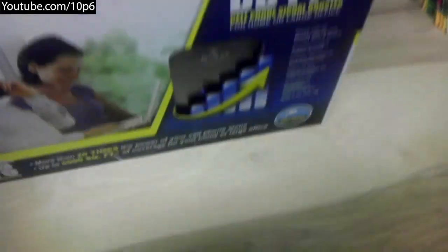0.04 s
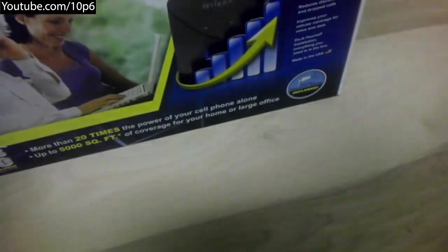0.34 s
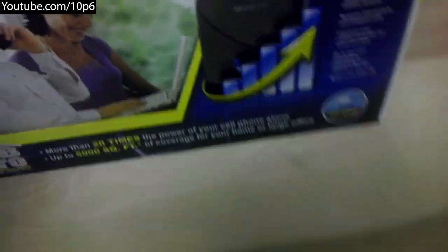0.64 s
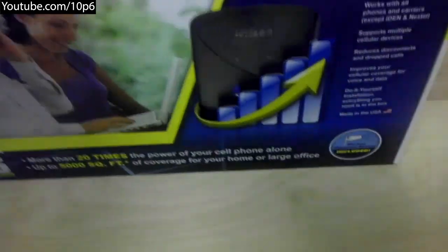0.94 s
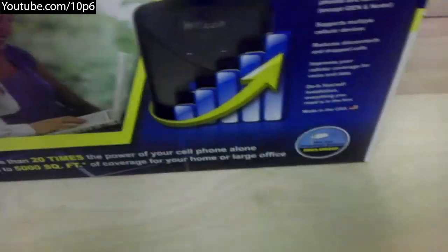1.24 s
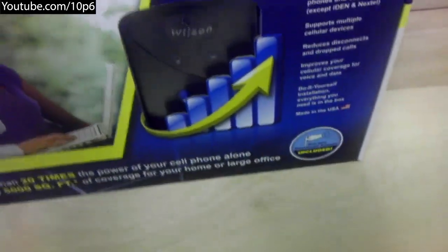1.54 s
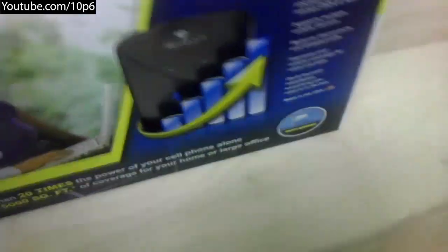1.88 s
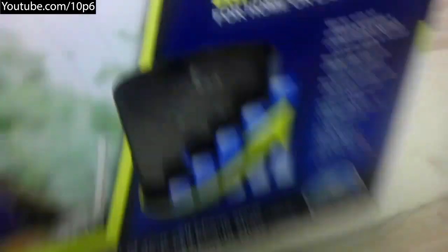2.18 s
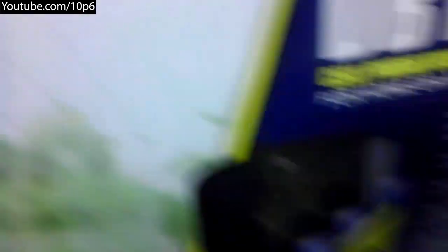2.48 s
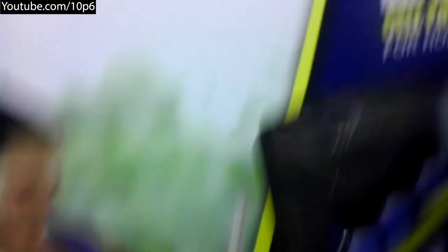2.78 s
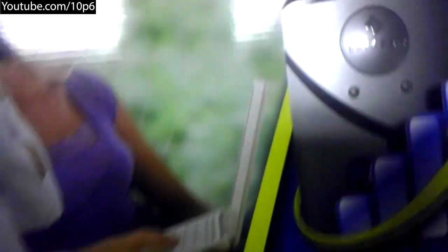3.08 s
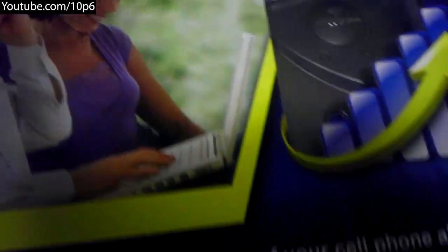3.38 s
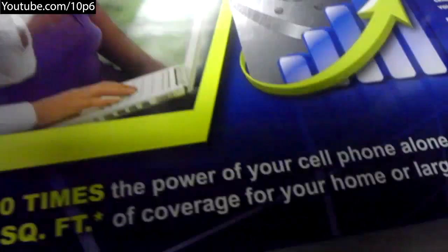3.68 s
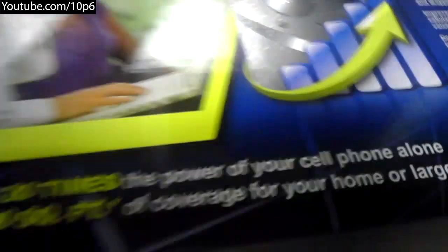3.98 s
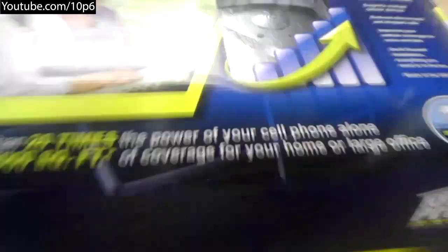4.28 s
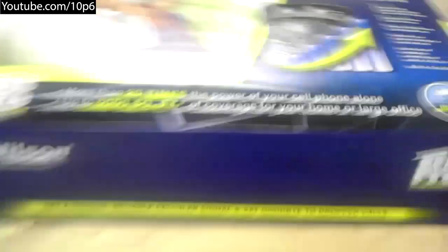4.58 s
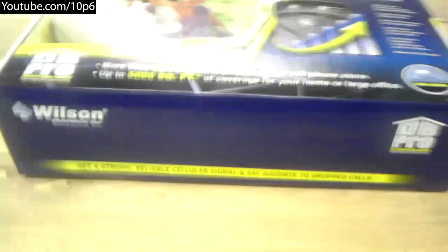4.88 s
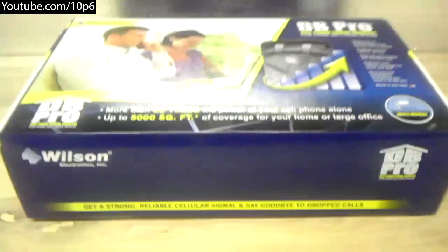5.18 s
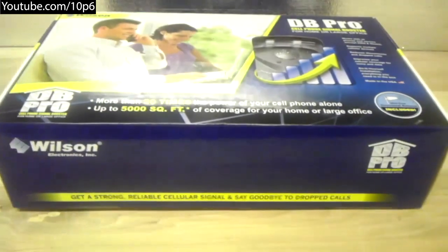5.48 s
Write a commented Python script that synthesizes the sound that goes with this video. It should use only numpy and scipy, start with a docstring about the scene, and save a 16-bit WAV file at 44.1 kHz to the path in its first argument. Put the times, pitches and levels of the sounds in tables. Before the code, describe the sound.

Close cardboard scraping and clusters of knocks as hands tip a big box over and drop it onto a tabletop.

```python
"""A large glossy cardboard box is turned over on a table in a small room, close to the microphone.
First it is gripped: light taps, and card rubbing on hands and table in tiny slips. From 1.7 s it is
tipped and turned: its contents shift and its panels knock, each blow a crack, a clap and a low thump.
At 3.2 s the card sticks and slips in one short squeak, and more knocks follow. From 4.3 s it settles
a little farther off, slapping the tabletop and making it ring; last, the fingers slide off."""
import sys
import numpy as np
from scipy import signal
from scipy.fft import rfft, irfft, next_fast_len
from scipy.io import wavfile
from scipy.ndimage import uniform_filter1d, map_coordinates

SR = 44100
rng = np.random.default_rng(int(sys.argv[2]) if len(sys.argv) > 2 else 0)


def store_pcm(level_fs):
    """Save levels as 16-bit WAV."""
    pcm = np.round(np.clip(level_fs, -1, 1) * 32767).astype(np.int16)
    wavfile.write(sys.argv[1], SR, np.atleast_2d(pcm).T)


N = 243793
RING = np.arange(SR // 2) / SR  # time since a blow [s]
SIDES = np.array([[1], [-1]]) / 2  # splits a left-minus-right amount between the channels


def amp(db):
    """Decibels to gain."""
    return 10 ** (np.asarray(db) / 20)


def unit(x):
    """Scale to rms 1."""
    return x / np.sqrt(np.mean(x ** 2) + 1e-20)


def burst(x):
    """Scale a blow to the energy of 20 ms at rms 1."""
    return x / np.sqrt(np.mean(np.sum(x ** 2, axis=-1)) / (SR * .02))


def along(points, hz):
    """Read (frequency [Hz], value) points along a log frequency axis."""
    freqs, values = np.transpose(points)
    return np.interp(np.log(hz + 1), np.log(freqs), values)


def wobble(rate):
    """A smooth random curve, rate knots a second."""
    knots = rng.standard_normal(int(N * rate / SR) + 4)
    return map_coordinates(knots, [np.arange(N) * rate / SR])


def filtered(x, response):
    """Shape x by a response given as a function of frequency."""
    n = x.shape[-1]
    size = next_fast_len(n + 8192, True)
    return irfft(rfft(x, size) * response(np.fft.rfftfreq(size, 1 / SR)), size)[..., :n]


def add(track, at, sound):
    """Mix in a sound, starting at a time in seconds."""
    part = track[:, max(round(at * SR), 0):][:, :len(RING)]
    part += sound[..., :part.shape[1]]


def spread(pair):
    """Two unrelated signals become left and right: shared bass, diffuse treble."""
    # how alike the two channels are: (frequency [Hz], correlation [0-1])
    likeness = [(35, 0.34), (80, 0.36), (150, 1), (450, 0.9), (1000, .66), (1900, .3), (3500, .22),
                (9000, 0.11)]
    turn = lambda hz: np.arccos(np.clip(along(likeness, hz), -1, 1)) / 2
    mid, side = filtered(pair, lambda hz: np.array([np.cos(turn(hz)), np.sin(turn(hz))]))
    return np.array([mid + side, mid - side])


def room_tone():
    """Quiet room air and microphone hiss."""
    # (frequency [Hz], relative level [dB])
    air = [(25, -19), (70, -15.5), (130, 0.5), (300, -2.5),
           (700, -7), (2000, -7), (6000, -20), (13000, -8.5)]
    noise = spread(rng.standard_normal((2, N)))
    return amp(-68) * unit(filtered(noise, lambda hz: amp(along(air, hz))))


def room_echo(x, gap_s):
    """Table and walls answer after a short gap; the echo pattern changes as the box moves."""
    # decay of the small room: (frequency [Hz], t60 [s])
    decay = [(120, 0.18), (280, 0.3), (700, 0.25), (1800, 0.19), (5000, 0.11), (12000, 0.14)]
    out, step = np.zeros((2, N + 2 * SR)), SR // 4
    for start in range(0, N, step):
        hz, t, noise = signal.stft(rng.standard_normal((2, SR // 2)), SR, nperseg=256)
        fade = amp(-60 * t / along(decay, hz)[:, None])
        tail = spread(signal.istft(noise * fade, SR, nperseg=256)[1])
        echo = signal.fftconvolve(x[:, start:start + step], tail / np.linalg.norm(tail[0]), axes=1)
        out[:, start + round(gap_s * SR):][:, :echo.shape[1]] += echo
    return out[:, :N]


def scuffs():
    """Skin or card skims the gloss in short scuffs, each a band of hiss; the band at 4.95 s is the sharp attack
    of the tabletop as the box lands."""
    # (peak time [s], half length [s], level [dB], band centre [Hz], left minus right [dB])
    touches = [(0.665, 0.0115, -48, 3330, -1.5), (1.687, .003, -35.5, 1255, -4.5),
               (1.712, 0.017, -33, 1520, -3), (2.44, 0.0065, -43.5, 12500, -3.5),
               (2.48, .022, -50, 12300, -4.5), (2.525, .004, -37, 12100, -7.5),
               (2.62, 0.053, -51.5, 13300, -9.5), (3.668, 0.0045, -27, 2500, -2),
               (4.778, 0.0037, -44.5, 4390, 14), (4.765, 0.021, -55.5, 5260, 9),
               (4.902, .014, -56, 5700, 5.5), (4.95, 0.0033, -31.5, 1920, 1), (5.125, 0.021, -41, 4320, 10),
               (5.186, 0.016, -55.5, 4930, 12)]
    out, t = np.zeros((2, N)), RING - RING.mean()
    for at, half, db, centre_hz, pan_db in touches:
        band = lambda hz: np.exp(-(np.log((hz + 1) / centre_hz) / 0.36) ** 2) + 0.023
        hiss = unit(filtered(spread(rng.standard_normal((2, len(t)))), band))
        swell = np.exp(-(t / half) ** 2 / 2)
        add(out, at + t[0], amp(db + SIDES * pan_db) * swell * hiss)
    return out


def stroke(at, length, attack_s, release_db_per_s):
    """Gain of one push of the hands: it gathers speed, slackens, then coasts to rest."""
    sag_db_per_s = 16.5
    age = np.maximum(np.arange(N) / SR - at, 0)
    rise = np.sin(np.pi / 2 * np.minimum(age / attack_s, 1)) ** 2
    return rise * amp(-sag_db_per_s * age - release_db_per_s * np.maximum(age - length, 0))


def squeak():
    """Card sticks and slips: a rough tone that swells under the push and stops as the grip lets go."""
    pitch_hz = 1456 * (1 + .14 * wobble(1100))
    phase = 2 * np.pi * np.cumsum(pitch_hz) / SR
    swell = stroke(at=3.207, length=.068, attack_s=0.035, release_db_per_s=1500)
    return swell * amp(-37.5 + 3.2 * wobble(300)) * unit(np.sin(phase))


def card(spectrum, force=1):
    """Stereo noise of rms 1, driven by a contact force and coloured by the hollow box."""
    # air and card resonances of the box: (frequency [Hz], width [Hz], lift [dB])
    hollow = [(280, 50, 0.5), (554, 50, 1), (770, 11, 9), (884, 70, 3), (1090, 49, 0), (1313, 25, 4),
              (1475, 28, 4), (1590, 12, 3), (1970, 76, 2.5), (2120, 45, 2), (2263, 60, 4.5),
              (2450, 35, 4.5), (2564, 90, 3.5), (2820, 42, 3.5), (3130, 230, 1.5)]
    lift = lambda hz: sum(db / (1 + (2 * (hz - centre) / width) ** 2) for centre, width, db in hollow)
    contact = spread(force * rng.standard_normal((2, N)))
    return unit(filtered(contact, lambda hz: amp(along(spectrum, hz) + lift(hz))))


def wandering(x, depth_db):
    """As the contact travels it favours ever different panel resonances."""
    spectra = signal.stft(x, nperseg=1024)[2]
    patches = uniform_filter1d(rng.standard_normal(spectra.shape[1:]), size=3, axis=0)  # over frequency
    patches = uniform_filter1d(patches, size=9, axis=1)  # over time
    return unit(signal.istft(spectra * amp(depth_db * unit(patches)), nperseg=1024)[1][:, :N])


def sliding():
    """Pushed card catches and lets go in tiny slips that shake the panels; the glossy skin hisses."""
    # pushes over hands or table, relative levels:
    # (time [s], length [s], rumble [dB], scrape [dB], hiss [dB])
    pushes = [(-0.03, 0.053, -46, -53, -61), (0.14, .46, -66.5, -70, -77.5),
              (0.242, .08, -61.5, -63.5, -76.5), (0.625, 0.093, -47, -52.5, -60),
              (0.797, 0.11, -50.5, -56, -63), (0.981, 0.16, -71, -72, -77), (1.317, 0.12, -53, -57, -66),
              (1.459, .21, -44.5, -51.5, -60.5), (1.657, .13, -38, -35, -61.5),
              (1.825, 0.14, -41.5, -51, -59.5), (2.092, .11, -49.5, -47.5, -61),
              (2.359, 0.035, -56, -65, -73.5), (2.421, 0.17, -47.5, -53, -52.5),
              (2.568, .13, -44.5, -47, -54.5), (2.724, .08, -50.5, -52, -59.5),
              (2.848, .115, -29.5, -28.5, -50), (2.981, 0.1, -33, -37, -59.5), (3.112, 0.18, -39, -49, -67),
              (3.293, .15, -45, -49.5, -62.5), (3.523, .1, -52.5, -61, -64),
              (3.612, 0.054, -43.5, -36.5, -61.5), (3.762, .19, -42.5, -47, -57.5),
              (3.985, .1, -45.5, -51, -63), (4.324, .34, -65.5, -59.5, -67.5),
              (4.637, .27, -59, -57, -59.5), (5.046, 0.11, -61, -57, -54.5)]
    # spectra of shaken panels, scraping card and gloss: (frequency [Hz], relative level [dB])
    rumble_spectrum = [(25, -22), (60, -28), (100, -12), (150, 0), (230, 1), (320, 2), (420, -4.5),
                       (700, -11.5), (2000, -54)]
    scrape_spectrum = [(120, -23), (450, 2), (700, 0.5), (1300, 0.5), (2100, -2), (3000, -11),
                       (4500, -16.5), (7000, -21), (14000, -41.5)]
    gloss_spectrum = [(1500, -12), (3500, 3), (5000, -1.5), (6200, -6), (8000, 0.5), (10000, -1),
                      (13000, 0), (14000, -8)]
    power = np.zeros((3, N))
    for at, length, *levels_db in pushes:
        power += np.outer(amp(levels_db), stroke(at, length, attack_s=0.047, release_db_per_s=167.5)) ** 2
    rumble_gain, scrape_gain, hiss_gain = np.sqrt(power)
    catch = wobble(70)
    slips = amp(2.4 * wobble(900) + 1.6 * catch)
    rumble = card(rumble_spectrum, amp(2.6 * catch))
    scrape = wandering(card(scrape_spectrum, slips), depth_db=4)
    fine_slips = amp(1.4 * wobble(1800) + .8 * catch)
    hiss = wandering(card(gloss_spectrum, fine_slips), depth_db=2.5)
    return amp(0.68) * rumble_gain * rumble + amp(3) * scrape_gain * scrape + amp(7) * hiss_gain * hiss


def dying(noise, t60, attack_s):
    """A random stretch of noise as one blow: dense modes that die together."""
    start = rng.integers(N - len(RING))
    envelope = amp(-60 * RING / t60) * (1 - np.exp(-RING / attack_s))
    return burst(noise[:, start:start + len(RING)] * envelope)


def ringing(modes, attack_s, scatter_db, detune):
    """Modes struck at a new spot, with a new grip: level and pitch vary from blow to blow."""
    ring = 0
    for hz, db, t60 in modes:
        louder, sharper = rng.standard_normal(2)
        envelope = amp(db + scatter_db * louder - 60 * RING / t60)
        ring += envelope * np.sin(2 * np.pi * hz * (1 + detune * sharper) * RING)
    return burst(ring * (1 - np.exp(-(RING / attack_s) ** 2)))


def landings():
    """The box drops flat: the tabletop thuds and the underside slaps."""
    # box meets table, relative levels: (time [s], thud [dB], slap [dB])
    drops = [(4.339, -29, -54.5), (4.673, -37, -36.5), (4.948, -46.5, -28.5), (4.96, -24.5, -21.5),
             (4.997, -32, -25), (5.017, -39, -33)]
    # tabletop modes, the stiff ones reached by the slap: (frequency [Hz], relative level [dB], t60 [s])
    low_modes = [(253, -4, 0.162), (293, 0, 0.16), (358, -9.5, 0.26), (433, 0.5, 0.1), (468.7, 4, 0.1),
                 (553, -6, 0.15), (617, -2, 0.11)]
    stiff_modes = [(688, -1.5, 0.14), (861, 1.5, 0.12), (1081, 3, 0.089), (1225, -7, 0.16),
                   (1965, -3.5, 0.14), (2080, -2.5, 0.18), (2330, -9.5, 0.23)]
    # slap of the underside: (frequency [Hz], relative level [dB])
    slap_spectrum = [(200, -35), (550, 2.5), (850, 0), (1500, 4.5), (2150, 2), (2450, -5), (4000, -13.5),
                     (8000, -20.5), (14000, -33)]
    out, slap = np.zeros((2, N)), card(slap_spectrum)
    for at, thud_db, slap_db in drops:
        add(out, at, amp(thud_db - .5) * ringing(low_modes, attack_s=.004, scatter_db=1.5, detune=.012))
        add(out, at, amp(slap_db - 3) * dying(slap, t60=0.22, attack_s=0.0013))
        add(out, at, amp(slap_db - 5) * ringing(stiff_modes, attack_s=.002, scatter_db=2, detune=.004))
    return out


def thump(hz, cycles):
    """A panel gives once and springs back: a heavily damped swing."""
    age = RING * hz / cycles  # 1 at the top of the swell
    return burst(age ** 2 * np.exp(-2 * age) * np.sin(2 * np.pi * hz * RING))


def struck_spot(blow, spot_hz, lift_db, q):
    """Each spot of the card has a resonance of its own, higher near a stiff edge."""
    b, a = signal.iirpeak(spot_hz, q, fs=SR)
    return burst(blow + (amp(lift_db) - 1) * signal.lfilter(b, a, blow))


def knocks():
    """The edge cracks, the card claps, and the slow bending waves of the panel arrive last."""
    # blows on the box, relative levels:
    # (time [s], thump [dB], thump pitch [Hz], clap [dB], spot resonance [Hz], edge crack [dB])
    blows = [(0.023, -46.5, 188, -46.5, 1270, -65), (0.629, -46, 191, -52, 496, -75),
             (0.649, -38.5, 316, -41.5, 497, -59), (0.81, -39.5, 218, -41.5, 1880, -47.5),
             (0.875, -51, 308, -41.5, 1410, -66), (1.333, -29.5, 162, -38, 1200, -53.5),
             (1.487, -43.5, 273, -36, 800, -60.5), (1.524, -40, 258, -42, 1010, -60),
             (1.733, -33.5, 324, -16.5, 1420, -34.5), (1.746, -19, 306, -16, 1130, -32),
             (1.758, -25.5, 140, -24.5, 1010, -44.5), (1.847, -27.5, 251, -36.5, 1180, -52),
             (1.902, -33.5, 250, -45, 790, -63), (1.941, -30.5, 250, -43, 1410, -72),
             (2.428, -26, 237, -33.5, 1500, -45), (2.437, -27.5, 133, -25, 1940, -41.5),
             (2.472, -35, 191, -39, 1290, -53), (2.803, -34, 199.5, -25.5, 1088, -50),
             (2.811, -15, 187, -15.5, 1640, -27.5), (2.821, -23.5, 148, -17, 497, -50),
             (2.843, -26, 252, -23, 910, -51), (2.906, -18.5, 227, -27.5, 1950, -35),
             (3.101, -24, 221, -36, 1680, -50), (3.12, -26.5, 280, -32, 820, -48),
             (3.188, -33.5, 216, -40, 1100, -57), (3.26, -28.5, 204, -32, 1510, -74),
             (3.384, -39.5, 256, -30.5, 1300, -66), (3.397, -32, 235, -34, 910, -66),
             (3.62, -32, 179, -20.5, 1380, -37.5), (3.683, -19.5, 214, -17.5, 1850, -33.5),
             (3.706, -24, 230, -22.5, 670, -62), (3.739, -22, 263, -24, 1930, -46),
             (3.949, -32.5, 193, -23, 1640, -32), (3.963, -26, 140.8, -12, 2100, -24.5),
             (3.975, -16, 260, -12.5, 1360, -55), (4.444, -49, 125, -74, 704, -63)]
    # bending modes of the panels: (frequency [Hz], relative level [dB], t60 [s])
    panel_modes = [(111, -30, 0.08), (152.4, -3, 0.11), (190.5, -4, .09), (235.6, 1, 0.087),
                   (274, 7.5, 0.06), (324.4, 2, .1), (366, -9.5, 0.087)]
    # spectra of card clap and edge crack: (frequency [Hz], relative level [dB])
    clap_spectrum = [(60, -46.5), (250, -2.5), (450, 3), (700, -2), (1400, -6.5), (2100, -10.5),
                     (3000, -14.5), (4200, -22), (6000, -37), (14000, -64)]
    crack_spectrum = [(1500, -31.5), (3500, 0.5), (5200, 8), (6200, -0.5), (7800, 6), (9000, 2.5),
                      (10500, -5.5), (14000, -16)]
    face = amp(SIDES * -1.3) * card(clap_spectrum)
    edge = amp(SIDES * -2.5) * card(crack_spectrum)  # the struck edges lie to the right
    snap = 1 + amp(3) * np.exp(-RING / .004)  # a crack is hardest in its first instant
    out = np.zeros((2, N))
    for at, thump_db, thump_hz, clap_db, spot_hz, crack_db in blows:
        clap = dying(face, t60=0.088, attack_s=0.0029)
        clap += amp(-6) * dying(face, t60=0.019, attack_s=0.0011)
        crack = burst(snap * dying(edge, t60=0.11, attack_s=0.00088))
        bending = ringing(panel_modes, attack_s=0.024, scatter_db=6.5, detune=.04)
        add(out, at, amp(crack_db - 6.5) * crack)
        add(out, at, amp(clap_db - 1.5) * struck_spot(clap, spot_hz, lift_db=10, q=2.1))
        add(out, at + .002, amp(thump_db - 1.5) * thump(thump_hz, cycles=.85))
        add(out, at + .003, amp(thump_db - 7) * bending)
    return out


def scene():
    """The box is handled close up, a little to the right; it lands farther off, with more room sound."""
    # balance of the box at the microphone: (frequency [Hz], left minus right [dB])
    balance = [(200, 0), (500, 2), (1100, -1), (2000, -3), (4000, 3.5), (8000, -2.5), (13000, -2)]
    # phase between the channels: (frequency [Hz], lead of the left [rad])
    lead = [(500, -0.097), (1300, 0.48), (1900, 1.4), (2600, 1.2), (3400, -0.67)]
    near = knocks() + sliding() + squeak()
    far = landings()
    box = near + far + room_echo(amp(-11) * near + amp(-7.5) * far, gap_s=.008)
    placement = lambda hz: amp(SIDES * along(balance, hz)) * np.exp(1j * SIDES * along(lead, hz))
    return filtered(box, placement) + scuffs() + room_tone()


def record(dry):
    """The small microphone loses deep bass, rounds off the highest peaks and cuts the top treble."""
    low_cut_hz, ceiling, top_hz = 85, .92, 14100
    thin = signal.sosfilt(signal.butter(2, low_cut_hz, "highpass", fs=SR, output="sos"), dry)
    rounded = thin / (1 + np.abs(thin / ceiling) ** 6) ** (1 / 6)
    return filtered(rounded, lambda hz: hz < top_hz)


dry = scene()
out = record(dry)
store_pcm(out)
```